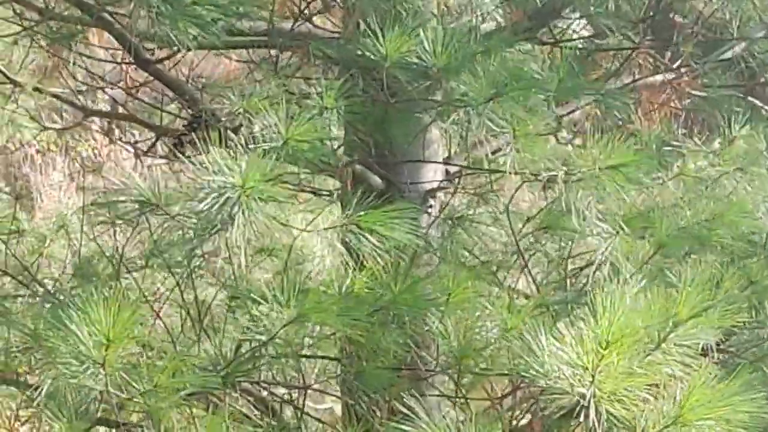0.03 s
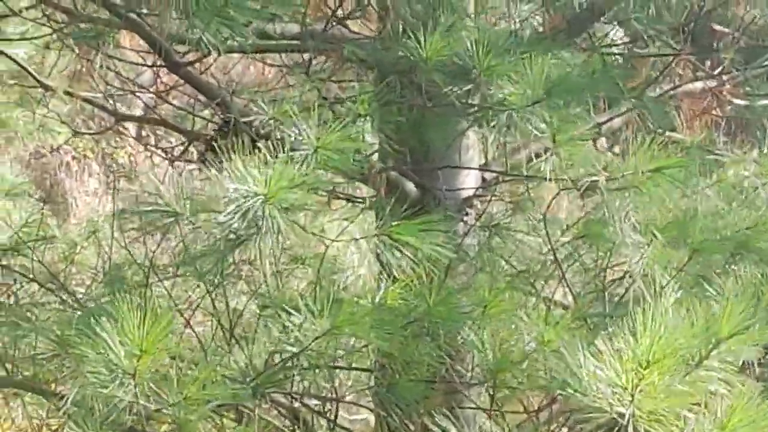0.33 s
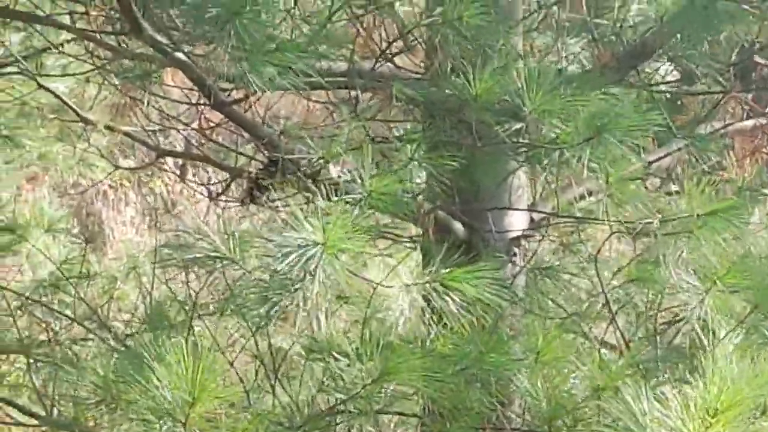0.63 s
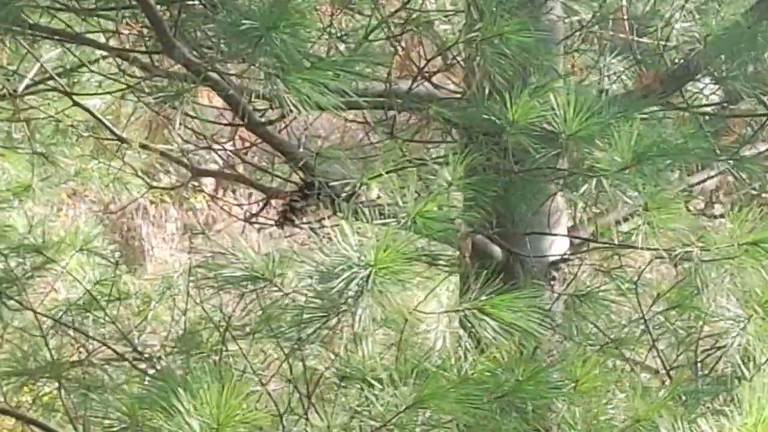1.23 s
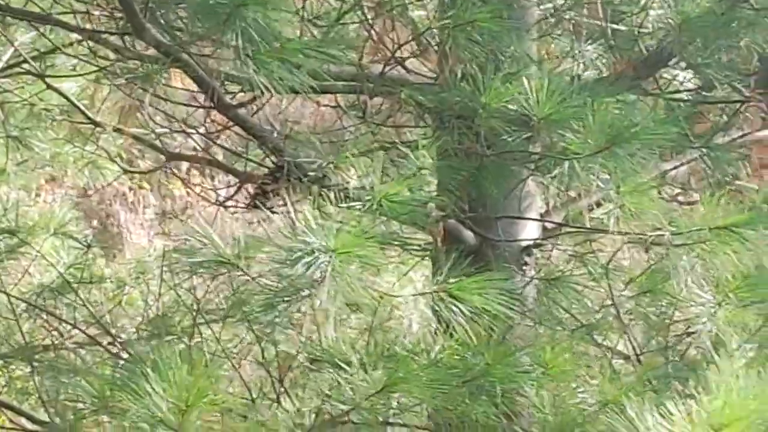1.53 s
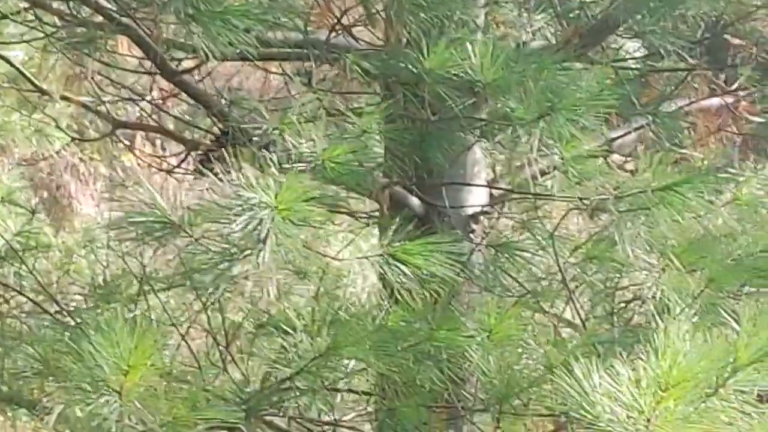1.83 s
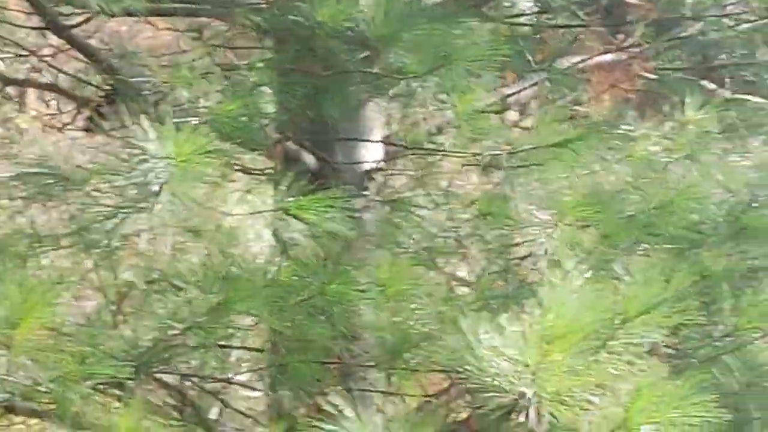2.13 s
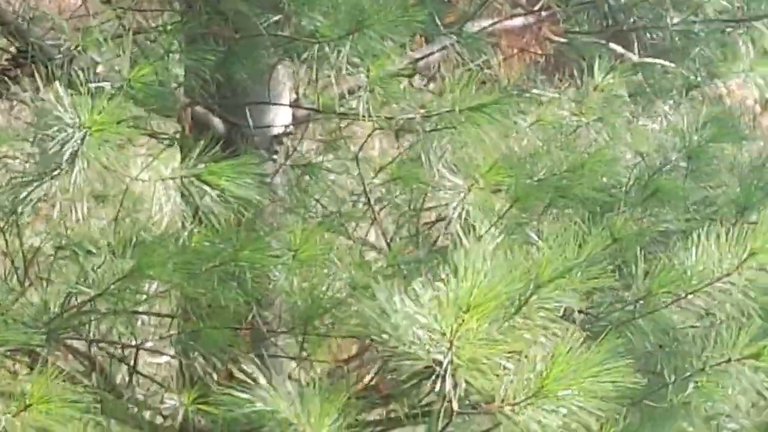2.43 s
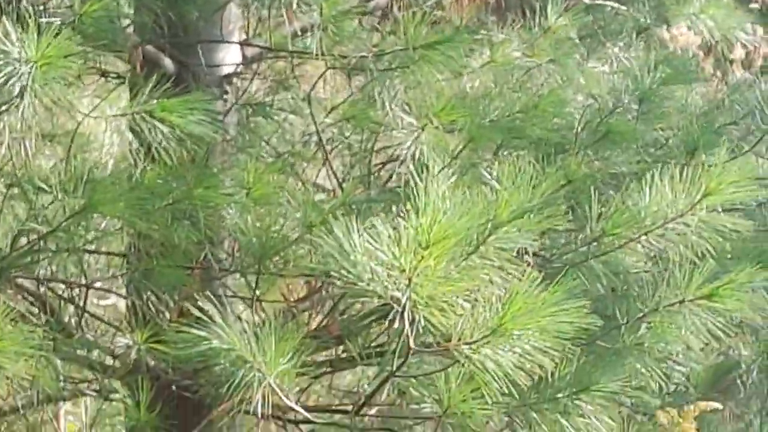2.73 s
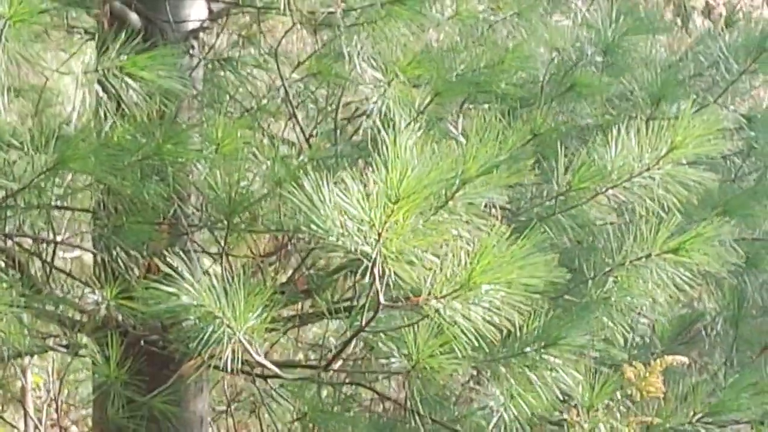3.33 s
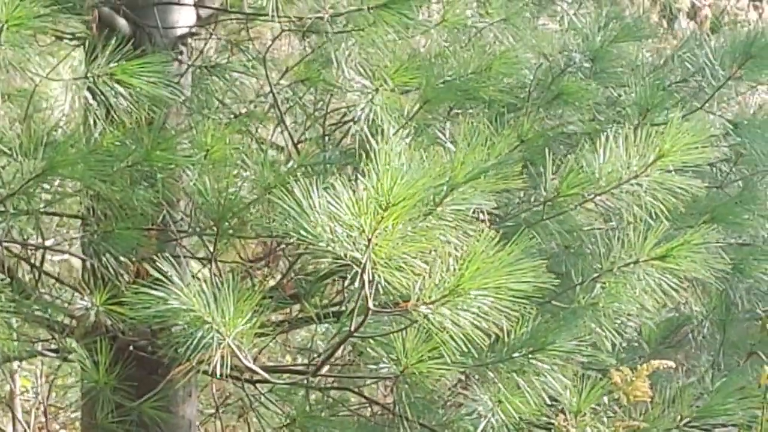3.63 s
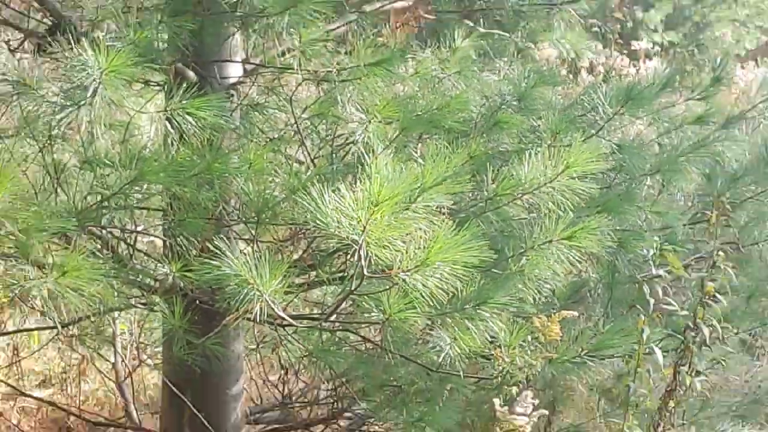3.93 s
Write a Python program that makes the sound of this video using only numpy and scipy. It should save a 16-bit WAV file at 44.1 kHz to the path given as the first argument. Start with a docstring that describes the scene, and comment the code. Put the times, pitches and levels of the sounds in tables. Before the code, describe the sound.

Distant road traffic roars softly through a pine wood, with a far engine humming. Dry rustles and ticks brush close to the microphone early on. A bird and an insect call faintly, and a second engine nears as the first fades.

```python
"""Distant road traffic roars softly through a pine wood, and a far engine hums under a faint hiss of needles.
In the first two seconds dry rustles brush close by, with sharp ticks that thin out later on.
A bird starts to peep faintly, then an insect chirps in three short runs.
Past halfway the engine slows and fades as a second one nears, and a few more peeps follow.
Road and engines sound wide, their right channel delayed a few milliseconds."""
import sys
import numpy as np
from scipy import signal
from scipy.fft import rfft, irfft
from scipy.io import wavfile
from scipy.ndimage import uniform_filter1d

SR = 44100
rng = np.random.default_rng(int(sys.argv[2]) if len(sys.argv) > 2 else 0)


def wav_out(sig):
    """Save sig, one row per channel (or a flat mono array), as 16-bit PCM at SR to the path in sys.argv[1]."""
    wavfile.write(sys.argv[1], SR, np.round(np.clip(np.atleast_2d(sig).T, -1, 1) * 32767).astype(np.int16))


N = 176400
T, HZ = np.arange(N) / SR, np.fft.rfftfreq(N, 1 / SR)
RIGHT_LAG_S = 0.003805

# Tone colour of the dry stuff that rustles and ticks: freq_hz, density_db_per_hz
DRY_COLOUR = [(500, -120), (2000, -103), (3000, -98.5), (4300, -95), (5500, -94.5), (6800, -89.5),
              (8200, -89.5), (9700, -100), (11800, -89), (12900, -104), (15500, -107)]


def amp(db):
    """Decibels to gain."""
    return 10 ** (np.asarray(db) / 20)


def unit(x):
    """Scales to rms 1."""
    return x / np.sqrt(np.mean(x ** 2) + 1e-20)


def spectrum(points):
    """A frequency table at every bin, joined on a log-frequency axis."""
    hz, value = np.transpose(points)
    return np.interp(np.log(HZ + 1), np.log(hz + 1), value)


def curve(points, column=1):
    """One column of a time table at every sample."""
    rows = np.array(points)
    return np.interp(T, rows[:, 0], rows[:, column])


def colour(x, points):
    """Gives white sound of rms 1 a spectrum in dB per Hz."""
    return irfft(rfft(x) * amp(spectrum(points)) * np.sqrt(SR / 2), N)


def bell(x, centre, width):
    """A bell curve of height 1."""
    return np.exp(-.5 * ((x - centre) / width) ** 2)


def band(x, centre_hz, width_hz):
    """A bell-shaped band-pass."""
    return irfft(rfft(x) * bell(HZ, centre_hz, width_hz), N)


def drift(rate_hz):
    """Slow random wandering of rms 1."""
    return unit(irfft(rfft(rng.standard_normal(N)) * bell(HZ, 0, rate_hz) * (HZ > 0), N))


def pan(side_db):
    """Left and right gains; side_db is left minus right."""
    return amp(np.array([[.5], [-.5]]) * side_db)


def wide_noise():
    """Wide stereo noise: the right channel is a slightly delayed, partly alike copy of the left."""
    # How alike left and right are: freq_hz, likeness (0 to 1)
    likeness = [(20, 0.64), (80, 0.94), (200, 0.86), (520, 0.61), (750, 0.52), (1000, 0.25), (1500, 0.28),
                (3000, 0.13), (8000, .05)]
    left, unrelated = rfft(rng.standard_normal((2, N)))
    same = np.clip(spectrum(likeness), 0, 1)
    right = same * left + np.sqrt(1 - same ** 2) * unrelated
    return irfft(np.array([left, right * np.exp(-2j * np.pi * HZ * RIGHT_LAG_S)]), N)


def wide_turns(hz):
    """Running phase of a tone in turns, the right channel slightly delayed."""
    return np.cumsum(hz) / SR - np.array([[0], [1]]) * hz * RIGHT_LAG_S


def road(waver_db=0.74, waver_hz=6):
    """Tyre roar with a wavering low hump and whine; it brightens and leans right as cars come nearer."""
    # Tone colour of the tyres: freq_hz, density_db_per_hz
    tyre_colour = [(20, -100), (45, -86), (65, -77.5), (130, -77.5), (170, -79.5), (240, -82.5), (330, -82),
                   (420, -67), (490, -62.5), (550, -62.5), (620, -66.5), (730, -71.5), (820, -66.5),
                   (900, -67), (1000, -63.5), (1100, -69.5), (1200, -73), (1400, -74), (1700, -80.5),
                   (2000, -91), (2500, -100), (3500, -112), (6000, -135)]
    # Swell of the whole roar, of its hump and of its whine: time_s, gain_db
    roar_swell = [(0, 0.5), (.5, 0.7), (1, 1), (1.55, 0.2), (2.15, -0.64), (2.45, -0.8), (3, -0.5),
                  (3.6, 1.67), (4, -0.5)]
    hump_swell = [(0, -5.5), (.2, -0.5), (.34, -5), (.75, -3.5), (1.15, -3), (1.48, 0), (1.85, -2),
                  (2.2, -4.5), (2.42, 2), (2.62, -2), (2.82, 0), (3.3, -3.5), (4, -2)]
    whine_swell = [(0, -2), (.7, -5.5), (1.35, -3.5), (1.52, 3), (1.9, -0.5), (2.2, 0), (2.7, 2),
                   (3.2, 0.5), (3.55, 0.5), (4, 1.5)]
    # Brightness and pan of the roar: time_s, treble_gain_db, side_db
    approach = [(0, -4, 0), (.9, -2, 0.5), (1.5, -2.2, 0), (2.2, 0.5, 0), (2.8, -1.3, 0.8),
                (3.4, -0.7, -1.7), (4, 3, -1.3)]
    roar = colour(wide_noise(), tyre_colour)
    hump = band(roar, centre_hz=479, width_hz=134)
    whine = band(roar, centre_hz=1018, width_hz=45)
    treble = band(roar, centre_hz=1750, width_hz=420)
    out = roar - hump - whine - treble  # each band comes back on its own fader
    out += treble * amp(curve(approach))
    out += hump * amp(curve(hump_swell) + waver_db * drift(waver_hz))
    out += whine * amp(curve(whine_swell) + waver_db * drift(waver_hz))
    return out * amp(curve(roar_swell)) * pan(curve(approach, column=2))


def fading_engine(waver_db=-0.2, waver_hz=3, wobble_rad=0.23):
    """A far engine hums on low multiples of its cycle rate, slowing and fading in its own rumble."""
    # Engine speed and fade of the hum: time_s, cycle_hz, gain_db
    run = [(0, 20.4, -1.5), (.7, 19, -4), (1.35, 19.9, -2), (1.8, 18.7, -8), (2.3, 19.2, -7.5),
           (2.7, 14.3, -21.5), (4, 15, -28)]
    # Partials of the hum: multiple of the cycle rate, level_db
    orders = [(3, -71), (4, -53), (5, -48), (7, -71), (9, -58.5), (10, -62), (12, -69.5), (13, -72),
              (14, -87), (16, -81)]
    # Tone colour of the rumble: freq_hz, density_db_per_hz
    rumble_colour = [(20, -112), (55, -90), (90, -70.5), (140, -75), (205, -80.5), (255, -66), (320, -63.5),
                     (380, -65), (500, -76), (1000, -110)]
    # Swell of the rumble: time_s, gain_db
    rumble_swell = [(0, -7.5), (.25, -6.5), (.42, -9.5), (.78, -6), (1.05, -12.5), (1.4, -15.5), (2.1, -18),
                    (2.75, -14), (3.3, -21.5), (4, -16.5)]
    turns = wide_turns(curve(run))
    hum = np.zeros((2, N))
    for order, level_db in orders:
        gain = amp(level_db + waver_db * drift(waver_hz))
        phase = 2 * np.pi * (order * turns + rng.random()) + wobble_rad * drift(waver_hz)
        hum += gain * np.sqrt(2) * np.sin(phase)
    rumble = colour(wide_noise(), rumble_colour)
    return hum * amp(curve(run, column=2)) + rumble * amp(curve(rumble_swell))


def needles(side_db=1.5, flicker_db=2.2):
    """Light air in the pine needles: a hiss that flickers in small patches of time and frequency."""
    # Tone colour of the hiss: freq_hz, density_db_per_hz
    hiss_colour = [(500, -125), (1800, -104), (2300, -101), (2800, -97.5), (3400, -103), (4300, -101.5),
                   (5300, -107.5), (8300, -111), (9600, -119), (12000, -116.5), (12700, -138),
                   (16000, -143)]
    # Swell of the hiss: time_s, gain_db
    hiss_swell = [(0, 0), (1.2, 1.3), (2.1, -1.7), (3, -3), (4, -2.5)]
    frames = signal.stft(rng.standard_normal((2, N)), nperseg=1024, noverlap=768)[2]
    patches = uniform_filter1d(rng.standard_normal(frames.shape[1:]), size=4, axis=0)  # across frequency
    patches = unit(uniform_filter1d(patches, size=8, axis=1))  # across time
    hiss = signal.istft(frames * amp(flicker_db * patches), nperseg=1024, noverlap=768)[1]
    return colour(unit(hiss[:, :N]), hiss_colour) * amp(curve(hiss_swell)) * pan(side_db)


def rustles(snaps_per_s=4000, spread_db=2.5, clump_db=2.4, clump_hz=130):
    """Each brush swells and dies as a shower of tiny dry snaps that come in clumps and ring thinly."""
    # Close brushes: peak_s, rise_s, decay_s, gain_db, side_db, tilt_db_per_octave, ring_db
    brushes = [(.3, 0.019, 0.032, -18, 6, -9, -2), (.36, 0.019, 0.077, -6.5, 7, -2.5, -7),
               (.42, 0.0096, .025, -6.5, 0, -9, -12), (.522, .014, .085, -10.5, 5, -2, -10),
               (.672, 0.01, .018, -12, 11, -4, 9), (.698, .007, .007, -11, 9, -4, 9),
               (0.964, 0.011, 0.032, 8, 2.5, -1, -14), (1.029, .011, 0.013, -9, -2, -8, -14),
               (1.1, .026, 0.079, -18, 5, -7, -8), (1.72, 0.044, 0.094, -21, 4, 0, 2),
               (1.895, 0.024, 0.072, -16, -3, -2, 6)]
    ring_hz, ring_width_hz, tilt_from_hz = 8120, 220, 2500
    onsets = rng.random(N) < snaps_per_s / SR
    strength_db = spread_db * np.minimum(rng.exponential(1, N), 4) + clump_db * drift(clump_hz)
    snaps = onsets * amp(strength_db) * rng.choice([-1, 1], (2, N))
    snap_spectrum = rfft(unit(snaps))
    octaves = np.log2(np.maximum(HZ, tilt_from_hz) / ring_hz)
    ring = bell(HZ, ring_hz, ring_width_hz)
    out = np.zeros((2, N))
    for peak_s, rise_s, decay_s, gain_db, side_db, tilt, ring_db in brushes:
        shower = irfft(snap_spectrum * amp(tilt * octaves) * (1 + amp(ring_db) * ring), N)
        shower = np.roll(shower, rng.integers(N), axis=1)  # a random stretch for each brush
        envelope = np.where(T < peak_s, bell(T, peak_s, rise_s), np.exp(-abs(T - peak_s) / decay_s))
        out += amp(gain_db) * pan(side_db) * shower * envelope
    return colour(out, DRY_COLOUR)


def ticks(decay_s=0.00033, tail_s=0.0094, tail_db=-25, repeat_s=0.004, repeat_db=-3, width_octaves=0.43):
    """Single sharper snaps of the same dry stuff, each repeated faintly a few milliseconds later and with a
    short tail."""
    # Close snaps: start_s, gain_db, band_centre_hz, side_db
    snaps = [(.412, 15, 6800, 7), (0.4166, 18, 6600, 0), (0.5044, 6, 8500, 5), (.5073, 11.5, 6600, 0.5),
             (.623, -8, 8500, 4), (.672, 11, 8300, 9), (.698, 2, 8100, 9), (0.947, 11, 7600, 15),
             (.9525, 11, 7600, 15), (0.957, 16, 9000, 11), (0.964, 14, 9000, 4), (1.0308, 6, 8000, -7),
             (1.0938, -3, 9500, 2), (1.108, 2, 9500, 2), (1.1975, -3, 8520, 0), (1.245, 1, 8500, -3),
             (1.2485, 1, 8500, 4), (2.1447, 1, 9800, 10), (2.2225, -5, 9000, 1), (3.2402, -5, 11000, 4),
             (3.264, 10, 9800, 12), (3.667, -1, 10830, 7)]
    repeat = 1 + amp(repeat_db) * np.exp(-2j * np.pi * HZ * repeat_s)
    out = np.zeros((2, N))
    for start_s, gain_db, centre_hz, side_db in snaps:
        age = abs(T - start_s)
        envelope = (T >= start_s) * (np.exp(-age / decay_s) + amp(tail_db) * np.exp(-age / tail_s))
        burst = envelope * rng.standard_normal((2, N))
        passband = bell(np.log2(HZ + 1), np.log2(centre_hz), width_octaves)
        out += amp(gain_db) * pan(side_db) * irfft(rfft(burst) * repeat * passband, N)
    return colour(out, DRY_COLOUR)


def bird(width_s=0.03, blur_hz=41):
    """Single soft peeps: thin tones, blurred by their way through the wood."""
    # Far peeps: peak_s, pitch_hz, level_db
    peeps = [(.69, 2600, -66), (1.479, 3300, -77), (2.68, 3241, -74), (2.78, 4350, -80), (2.96, 3440, -76),
             (2.97, 2354, -69), (3.15, 4350, -76), (3.24, 4770, -81)]
    out = np.zeros((2, N))
    for peak_s, pitch_hz, level_db in peeps:
        whistle = unit(band(rng.standard_normal((2, N)), pitch_hz, blur_hz))
        out += amp(level_db) * bell(T, peak_s, width_s) * whistle
    return out


def insect(pitch_hz=7470, waver_depth_hz=35, waver_rate_hz=60, chirps_per_s=14.3, side_db=4):
    """Short runs of thin, high chirps on one slightly unsteady pitch; each run swells and fades."""
    # Runs of chirps: start_s, end_s, level_db
    runs = [(1.2, 1.63, -76), (2.04, 2.24, -88), (2.243, 2.66, -76)]
    envelope = np.zeros(N)
    for start_s, end_s, level_db in runs:
        progress = np.clip((T - start_s) / (end_s - start_s), 0, 1)
        chirps = bell((T - start_s) * chirps_per_s % 1, centre=.5, width=.14)
        envelope += amp(level_db) * np.sqrt(np.sin(np.pi * progress)) * chirps
    turns = np.cumsum(pitch_hz + waver_depth_hz * drift(waver_rate_hz)) / SR
    return np.sqrt(2) * np.sin(2 * np.pi * turns) * envelope * pan(side_db)


def nearing_engine(wobble_rad=.4, wobble_hz=4, rumble_width_hz=19):
    """The firing note of a second engine swells unevenly, with a narrow rumble shifting just above it."""
    # The engine drawing near: time_s, pitch_hz, note_db, rumble_db, rumble_centre_hz
    approach = [(0, 135, -81, -67, 195), (2.2, 131, -73, -70.5, 185), (2.6, 131, -55, -62, 200),
                (3.1, 132, -58, -59.5, 200), (3.35, 136, -57, -68, 195), (3.8, 140, -87, -55.5, 165),
                (4, 140, -54, -52.5, 163)]
    note_phase = 2 * np.pi * wide_turns(curve(approach)) + wobble_rad * drift(wobble_hz)
    note = np.sqrt(2) * np.sin(note_phase)
    rumble_phase = 2 * np.pi * wide_turns(curve(approach, column=4))
    rumble = drift(rumble_width_hz) * np.cos(rumble_phase) + drift(rumble_width_hz) * np.sin(rumble_phase)
    return note * amp(curve(approach, column=2)) + rumble * amp(curve(approach, column=3))


def scene():
    """A bed of far traffic under the small sounds of the wood."""
    traffic = road() + fading_engine() + nearing_engine()
    return traffic + needles() + rustles() + ticks() + bird() + insect()


def record(dry):
    """A steep low-pass trims the very top of the treble."""
    lowpass = signal.firwin(511, cutoff=15750, window=("kaiser", 9), fs=SR)
    return signal.oaconvolve(dry, lowpass[None], "same")


dry = scene()
out = record(dry)
wav_out(out)
```